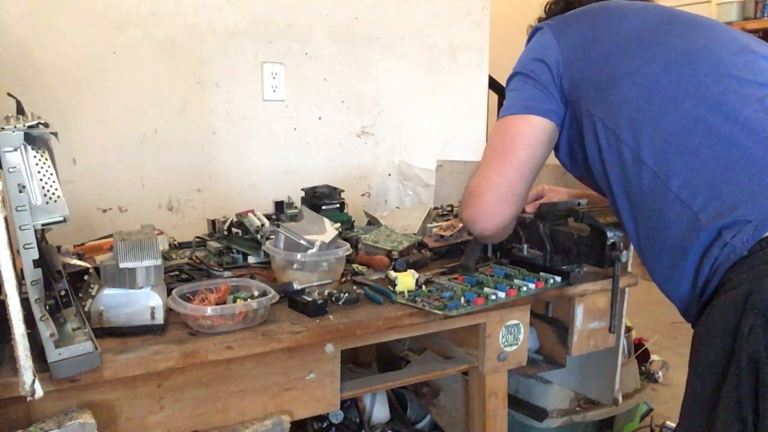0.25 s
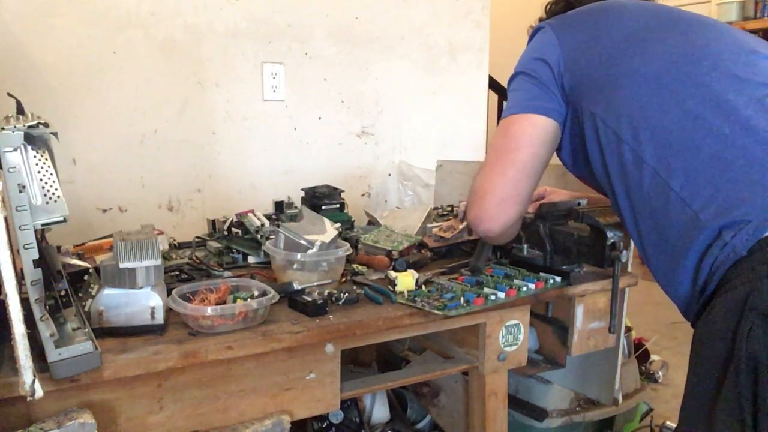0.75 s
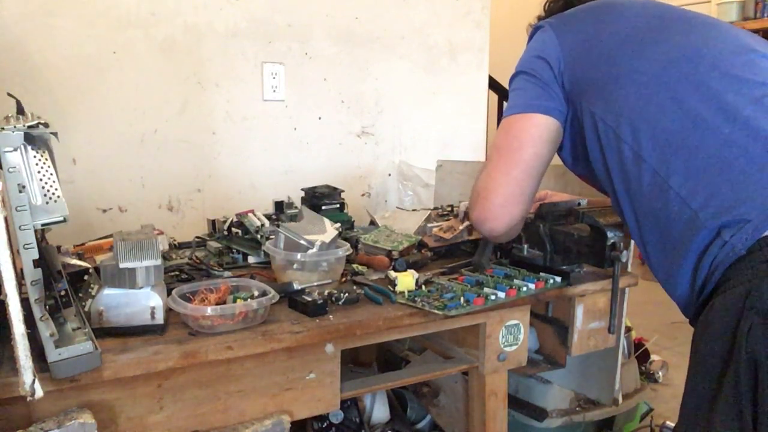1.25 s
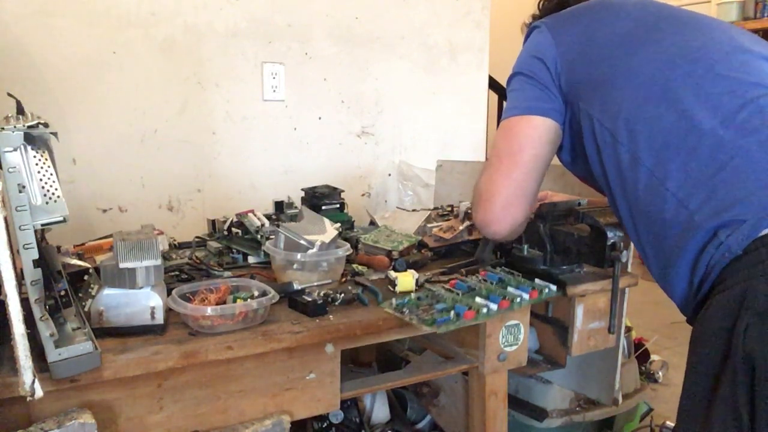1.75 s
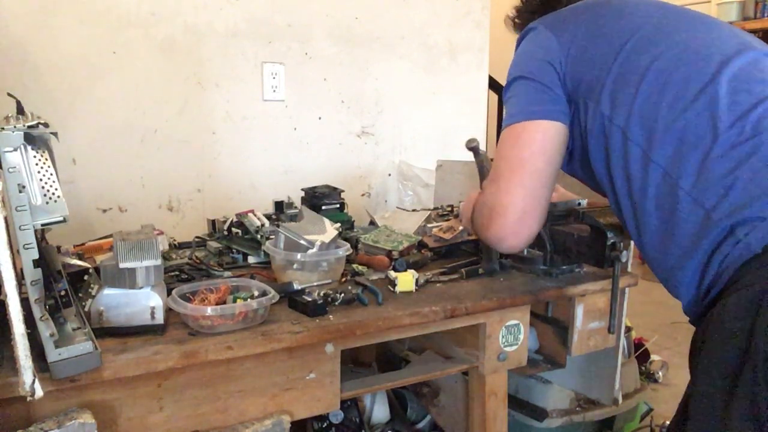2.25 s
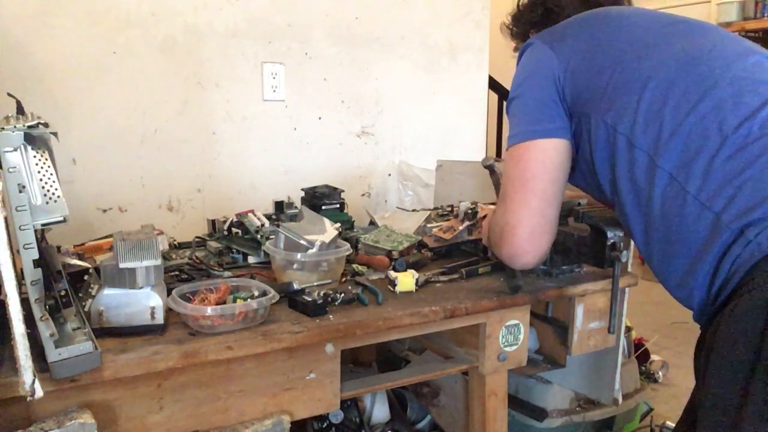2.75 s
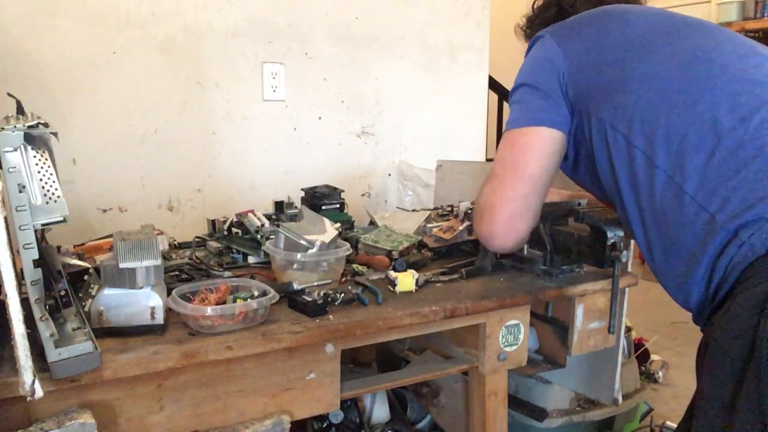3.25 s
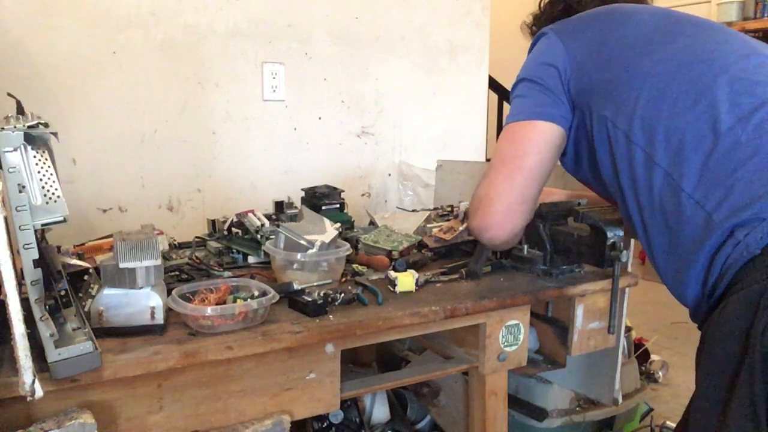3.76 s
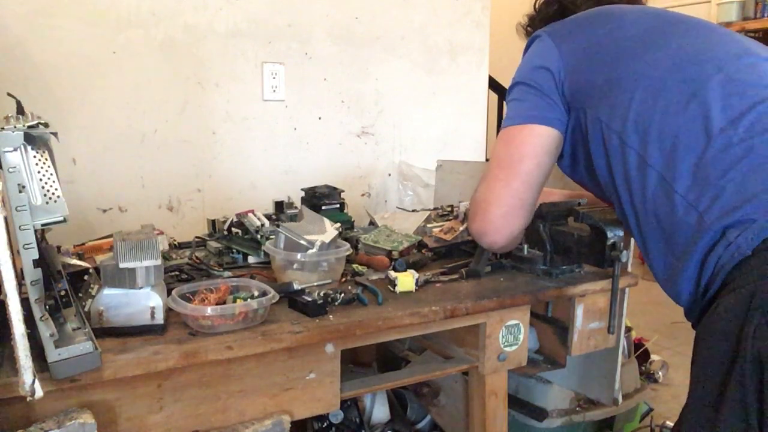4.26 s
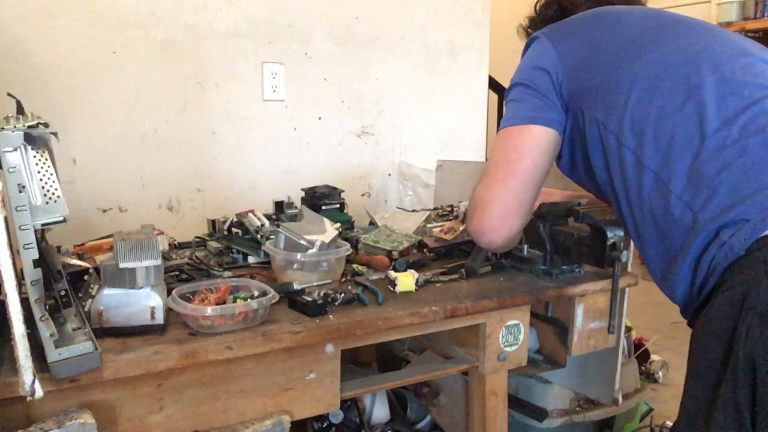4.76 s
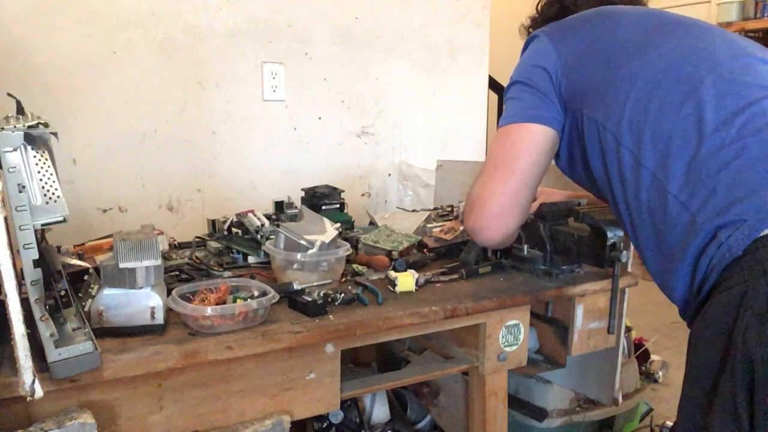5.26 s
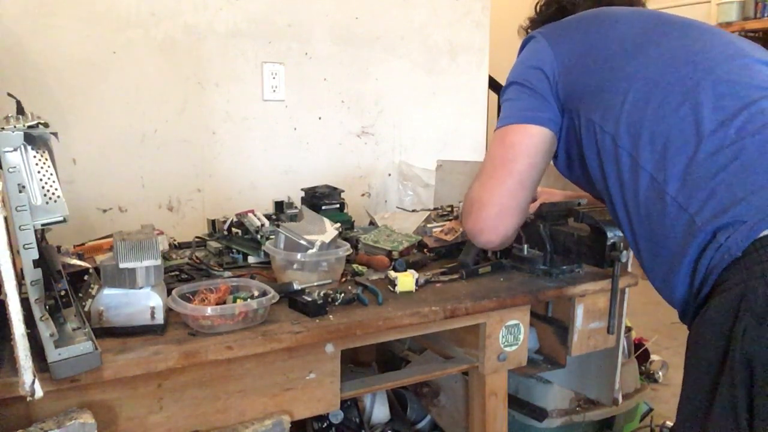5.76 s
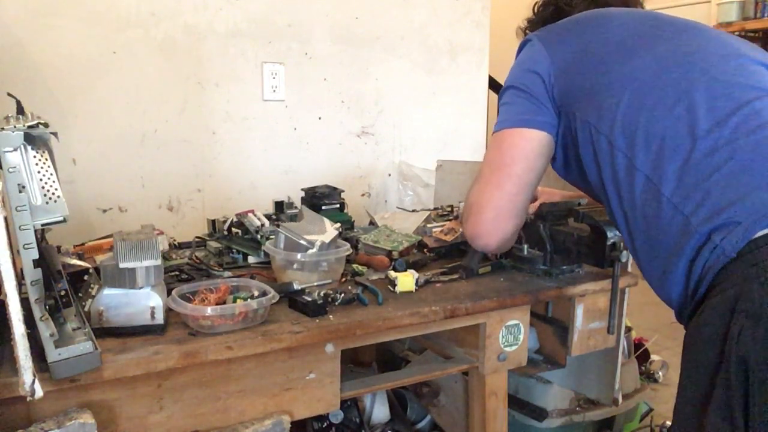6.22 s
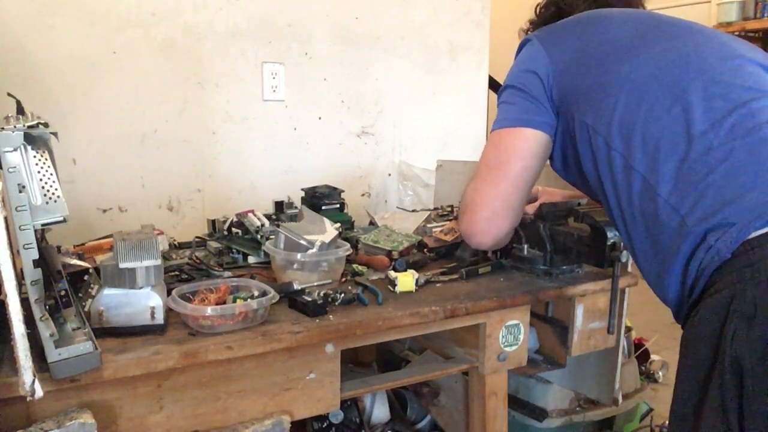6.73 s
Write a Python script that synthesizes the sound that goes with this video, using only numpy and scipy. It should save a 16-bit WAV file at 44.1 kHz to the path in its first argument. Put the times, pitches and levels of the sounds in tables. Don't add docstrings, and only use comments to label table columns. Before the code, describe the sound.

From 0 to 1.7 s a small steel hammer strikes a hollow plastic box over a vice, eight blows roughly 0.23 s apart. Each is a sharp tick and plastic crack with a boxy knock, short bench thud, slight metallic ring and chatter of loose parts. After a short gap, a circuit board slides off; from about 2.2 s it crashes into floor scrap, densest and loudest around 2.35-2.45 s, with scrapes, slaps and small metal pings, then bounces and settles by 3.05 s. At 3.1 s hammering resumes at a similar pace and continues to the end near 6.9 s, mostly firm, with weak taps near 5.7 and 6.0 s. Parts occasionally hop, notably at 3.56 s, and a thin high vice ring follows some blows. Hard-walled room, short bright reverberation, faint hush, small nearby microphone, little deep bass.

```python
import sys
import numpy as np
from scipy import signal
from scipy.fft import rfft, irfft
from scipy.io import wavfile
from scipy.ndimage import uniform_filter1d

SR = 44100
rng = np.random.default_rng(int(sys.argv[2]) if len(sys.argv) > 2 else 0)


def transcribe(u):
    v = np.clip(np.atleast_2d(u).T, -1, 1)
    q = np.round(v * 32767).astype(np.int16)
    wavfile.write(sys.argv[1], SR, q)


def gain_from_db(level_db):
    decades = np.asarray(level_db, float) / 20
    return 10 ** decades


N = 308233

# f/Hz, level/dB, t60/s
VICE_MODES = [(726, 0, .3), (1908, 0, .15), (4188, -6, .5)]


def colour(x, points):
    hz, db = np.transpose(points)
    f_hz = np.fft.rfftfreq(len(x), 1 / SR) + 1
    gain = gain_from_db(np.interp(np.log(f_hz), np.log(hz), db))
    return irfft(rfft(x) * gain, len(x))


def band(x, lo_hz, hi_hz):
    sos = signal.butter(2, [lo_hz, min(hi_hz, SR / 2.1)], "band", fs=SR, output="sos")
    return signal.sosfilt(sos, x)


def unit(x):
    return x / np.sqrt(uniform_filter1d(x ** 2, size=256).max())


def clock(size):
    return np.arange(size) / SR


def decay(t, t60_s):
    return np.exp(-np.log(1000) * t / t60_s)


def add(out, x, s):
    i = max(int(s * SR), 0)
    out[i:i + len(x)] += x[:N - i]


def ring(modes, scatter_db, loose, size=22050):
    hz, db, t60_s = np.array(modes, float).T[:, :, None]
    pitch, strength, phase = rng.standard_normal((3, len(modes), 1))
    t = clock(size)
    waves = np.sin(2 * np.pi * hz * (1 + loose * pitch) * t + phase) * decay(t, t60_s)
    return (gain_from_db(db + scatter_db * strength) * waves).sum(axis=0)


def struck(modes, rise_s, scatter_db=3.0, loose=0.0043):
    x = ring(modes, scatter_db, loose)
    return unit(x * (1 - np.exp(-(clock(len(x)) / rise_s) ** 2)))


def smear(spread_s, step_hz, size=22050):
    width = int(step_hz * size / SR)
    luck = np.repeat(rng.gamma(1.3, .77, size // 20), width)[:size // 2 + 1]
    lag_s = 0.000508 + spread_s * uniform_filter1d(luck, width)
    phase = 2 * np.pi * np.cumsum(lag_s) * SR / size
    x = irfft(np.exp(-1j * phase), size)
    x[size // 2:] = 0
    return x


def grains(size, per_s):
    chance, side = rng.random((2, size))
    strength = gain_from_db(3.5 * np.minimum(rng.exponential(size=size), 3.5))
    x = (chance < per_s / SR) * strength * np.sign(side - .5)
    return x / np.sqrt(np.mean(x ** 2))


def room_hush():
    # f/Hz, density/dB per Hz
    spectrum = [(30, -18), (100, -27), (200, 14), (500, -14), (1500, -20), (5000, -31), (10000, -20),
                (16000, -41)]
    x = colour(rng.standard_normal(N), spectrum)
    return gain_from_db(-66) * x / x.std()


def blows():
    # push into case and bench/dB, skid of face/dB, vice/dB
    first_bout = [
        (0.0014, -19.5, -10.5, -8.5, -21),
        (0.2323, -15, -6, 2, -21.5),
        (0.4808, -16.5, -20, -1.5, -28),
        (0.7715, -19.5, -3.5, -6.5, -17),
        (0.998, -19, -8, -19, -36),
        (1.216, -17, -5.5, -12, -22),
        (1.4407, -14.5, -2.5, -8, -22.5),
        (1.6745, -17.5, -9.5, -5.5, -19),
    ]
    second_bout = [(3.091, -20, -14.5, -6.5, -16.5), (3.3117, -19, -9.5, -3, -20),
                   (3.532, -17, -3.5, -15, -25), (3.7615, -23.5, -3.5, 7, -15.5),
                   (4.0404, -17.5, -13.5, -21, -38), (4.2746, -23.5, -5.5, -10, -36),
                   (4.5086, -17.5, -5.5, -15, -17), (4.7379, -15, -10, -13.5, -16.5),
                   (4.9625, -15.5, -9.5, -11.5, -22), (5.1942, -14, -9, -19, -21),
                   (5.4267, -13.5, -13.5, -18, -21.5), (5.675, -27.5, 0, 7, -21),
                   (5.9738, -30, -12.5, 0, -33), (6.2009, -17, -10.5, -17.5, -16.5),
                   (6.4208, -16.5, -9.5, -11, -19.5), (6.6365, -18, -4.5, -7.5, -12),
                   (6.855, -14, -12, -11, -16.5)]
    # box wall/dB, hammer head/dB, vice middle mode/dB
    seating = [
        (-2, -36, -38),
        (-4.5, -31, -43),
    ]
    usual_db = -17.5
    head_growth, vice_growth, wall_give = 1.64, 2.8, -0.11
    for bout, (wall_db, head_db, middle_db) in zip((first_bout, second_bout), seating):
        for s, force_db, push_db, skid_db, vice_db in bout:
            extra_db = force_db - usual_db
            box_db = wall_db + wall_give * extra_db
            thud_db = -7 + 0.33 * push_db
            steel_db = head_db + head_growth * extra_db
            vice_dbs = (force_db + vice_db, middle_db + vice_growth * extra_db, -49 + extra_db)
            parts_db = force_db - 20 + 0.69 * skid_db
            yield s, force_db, box_db, push_db, thud_db, skid_db, steel_db, vice_dbs, parts_db


def face_tick():
    # f/Hz, level/dB
    spectrum = [(7000, -2.5), (9000, 7), (10500, 1), (13500, 6.5), (16000, -12)]
    click = smear(0.001, 900) + gain_from_db(-2.5) * smear(.01, 110)
    return unit(band(colour(click, spectrum), 9600, 20000))


def box_top(crack):
    # f/Hz, level/dB, t60/s
    modes = [(2300, -1, .07), (2670, -1, .055), (2900, -1, .065), (3197, 0, .055), (3680, -8, .06),
             (3845, -9, .12), (3925, -7, .12), (4830, -7, .05)]
    return struck(modes, 0.0023) + gain_from_db(3) * unit(band(crack, 3170, 7090))


def box_wall(crack):
    # f/Hz, level/dB, t60/s
    modes = [(1030, -4, .035), (1200, -5, .035), (1385, -2, .06), (1490, -1, .035), (1565, 0, .045)]
    return struck(modes, 0.0016) + gain_from_db(1.5) * unit(band(crack, 698, 2040))


def box_case(crack):
    # f/Hz, level/dB, t60/s
    modes = [(335, -4, .05), (410, -2, .05), (490, -2, .045), (630, 0, .055), (850, -5, .04)]
    return struck(modes, 0.0029) + gain_from_db(1.5) * unit(band(crack, 270, 1080))


def bench_thud():
    # f/Hz, level/dB, t60/s
    modes = [(55, -15, .08), (104, -7, .12), (180, -5, .06), (219, 0, .08), (277, -3, .07)]
    return struck(modes, 0.0046)


def bottoming_knock():
    pulse = 1. * (clock(22050) == 0)
    knock = band(pulse, 380, 3200)
    return knock / knock.max()


def head_ring():
    # f/Hz, level/dB, t60/s
    modes = [(7765, -2, .08), (7820, 0, .12)]
    return struck(modes, .001, scatter_db=1, loose=.0005)


def parts_chatter():
    t = clock(22050)
    chatter = grains(len(t), 3500) * (t / .025) * np.exp(-t / 0.028)
    return unit(band(chatter, 630, 14600))


def hammer():
    # f/Hz, density/dB per Hz
    crack_spectrum = [(300, 27.5), (700, 7), (1000, -14), (1600, 3), (3000, -8), (5000, -19), (7000, -23),
                      (10000, -17), (16000, -20)]
    out = np.zeros(N)
    for s, force_db, box_db, case_db, thud_db, skid_db, steel_db, vice_dbs, parts_db in blows():
        crack = colour(smear(.007, 120), crack_spectrum)
        add(out, gain_from_db(force_db - 14.0) * (box_top(crack) + gain_from_db(skid_db + 4) * face_tick()), s)
        bending = gain_from_db(box_db) * box_wall(crack) + gain_from_db(case_db) * box_case(crack)
        add(out, gain_from_db(force_db - 7.0) * bending, s + 0.003355)
        add(out, gain_from_db(force_db - 1 + thud_db) * bench_thud(), s + 0.00489)
        add(out, gain_from_db(force_db + 0.5 - .15 * skid_db) * bottoming_knock(), s + .0052)
        add(out, gain_from_db(steel_db - 8) * head_ring(), s)
        for mode, db in zip(VICE_MODES, vice_dbs):
            add(out, gain_from_db(db + mode[1] - 3) * struck([mode], .003, scatter_db=0, loose=.0015), s + .002)
        add(out, gain_from_db(parts_db) * parts_chatter(), s)
    return out


def vice_singing():
    # t/s, level/dB
    sings = [
        (0.003, -41.5),
        (4.74, -40),
        (5.196, -41),
        (5.429, -42.5),
        (6.422, -43.5),
    ]
    out, t = np.zeros(N), clock(SR // 2)
    hz, _, t60_s = VICE_MODES[-1]
    tone = np.sin(2 * np.pi * hz * t) * decay(t, t60_s) * (1 - np.exp(-t / .003))
    for s, db in sings:
        add(out, gain_from_db(db) * tone, s)
    return out


def floor_contact(slap_db, low_db, thump_db, bright_db, scrape_ms):
    # f/Hz, level/dB, t60/s
    modes = [(209, -4, 0.067), (103, -11, 0.084), (273.3, -6, 0.088)]
    drag = smear(scrape_ms / 1000, 110)
    scrape = drag * (1 + 0.23 * np.abs(grains(len(drag), 900))) + gain_from_db(-6) * smear(0.000938, 491)
    slap = unit(band(scrape, 1110, 4570)) + gain_from_db(low_db) * unit(band(scrape, 328, 1850))
    bright = gain_from_db(bright_db) * unit(band(scrape, 2760, 13900))
    return gain_from_db(slap_db - 6.0) * (slap + bright + gain_from_db(thump_db) * struck(modes, 0.0043))


def part_hops():
    # low/dB, bright/dB
    hops = [
        (0.038, -26.5, -5, -19),
        (0.7988, -26.5, -12, -9),
        (1.6508, -33, 4, -22),
        (3.2076, -38, -9, -11),
        (3.5609, -22, -4, -6),
        (4.2993, -27, -3.5, -8),
        (4.5374, -26.5, -6, 0),
        (5.644, -56, -6, -20),
        (5.7022, -26.5, -3.5, -9),
        (6.004, -29.5, -2.5, -8),
    ]
    out = np.zeros(N)
    for s, slap_db, low_db, bright_db in hops:
        add(out, floor_contact(slap_db, low_db, -2.5, bright_db, scrape_ms=6.5), s)
    return out


def board_landings():
    # low/dB, thump/dB, bright/dB
    landings = [(2.1525, -121, -26, -13, -15), (2.212, -58, 0, -3, 2), (2.2497, -22.5, -2, -7, 9),
                (2.3401, -21.5, 3.5, -19, -1), (2.3523, -15, -31, -25, -2), (2.367, -26.5, 14, -22, 9.5),
                (2.397, -17, 4, -33, -31), (2.4101, -15.5, -2, -5.5, 4.5), (2.4297, -33, -1, 6, 5),
                (2.5509, -29.5, -8, -1, -6), (2.588, -24, -1, -7, -3), (2.6453, -23, -1.5, -9, -5),
                (2.6786, -26.5, 0, -4, -3), (2.6995, -17, -1.5, -9.5, 0), (2.7744, -30.5, 6, -2, -8),
                (2.7812, -23.5, -24, -14, -3), (2.896, -23, -10, -28, 3.5), (2.974, -30, -4, -10, -22),
                (3.0194, -35, -4, -35, -11)]
    slide_end_s, slide_ms, bounce_ms = 2.36, 11, 4.0
    out = np.zeros(N)
    for s, slap_db, low_db, thump_db, bright_db in landings:
        scrape_ms = slide_ms if s < slide_end_s else bounce_ms
        add(out, floor_contact(slap_db, low_db, thump_db, bright_db, scrape_ms), s)
    return out


def metal_pings():
    # t/s, f/Hz, level/dB, t60/s
    pings = [(2.216, 1390, -58, 0.033), (2.321, 7300, -39, .04), (2.356, 780, -22, 0.06),
             (2.366, 1030, -25.5, 0.032), (2.397, 1353, -21, 0.11), (2.425, 1390, -37, 0.082),
             (2.48, 1378, -44, 0.1), (2.698, 9020, -26, .02), (2.70, 878, -30, 0.06),
             (2.74, 890, -34.5, 0.084), (2.78, 2870, -41, 0.016), (2.898, 947, -38, 0.068),
             (2.945, 885, -40, 0.069), (2.965, 900, -38, 0.062), (2.985, 885, -35, 0.035),
             (3.011, 960, -54, 0.067), (3.04, 910, -66, 0.11)]
    out = np.zeros(N)
    for s, hz, db, t60_s in pings:
        pair = [(hz, 0, t60_s), (hz + 35, -4, t60_s)]
        add(out, gain_from_db(db) * struck(pair, .002, scatter_db=0, loose=0), s)
    return out


def scrap_shuffle():
    # t/s, level/dB
    track = [
        (2.26, -74),
        (2.304, -21),
        (2.398, -17.5),
        (2.426, -41),
        (2.588, -26),
        (2.818, -34),
        (3.01, -34.5),
        (3.07, -52),
    ]
    s, db = np.transpose(track)
    luck = np.repeat(rng.standard_normal(N // 400 + 1), 400)
    clusters = uniform_filter1d(luck, size=300)[:N]
    x = band(grains(N, 4000) * gain_from_db(8.4 * np.minimum(clusters, 1.1)), 310, 8500)
    return x * gain_from_db(np.interp(clock(N), s, db, left=-200, right=-200) - 13.0)


def echoes(x):
    # delay/s, level/dB
    paths = [
        (.0046, -6),
        (.0093, -14),
        (0.0149, -12),
    ]
    return x + sum(gain_from_db(db) * np.pad(x, (int(s * SR), 0))[:N] for s, db in paths)


def tail(x):
    # f/Hz, t60/s
    room_t60 = [(60, 0.68), (120, 0.57), (250, 0.32), (700, 0.49), (2000, 0.42), (5000, 0.48),
                (10000, 0.22), (16000, 0.25)]
    late_db, late_stretch = -14.5, 3.11
    t = clock(SR)
    hz, t60_s = np.transpose(room_t60)
    response = 0
    for f_hz in 32 * 2 ** np.arange(0, 9.1, .5):
        fall = decay(t, np.interp(np.log(f_hz), np.log(hz), t60_s))
        fall = fall + gain_from_db(late_db) * fall ** (1 / late_stretch)
        noise = band(rng.standard_normal(SR), f_hz / 2 ** .25, f_hz * 2 ** .25)
        response = response + noise * fall
    response *= 1 - np.exp(-(t / 0.012) ** 2)
    response = gain_from_db(-3.5) * response / np.sqrt(np.sum(response ** 2))
    return signal.fftconvolve(x, response)[:N]


def scene():
    bench = hammer() + vice_singing()
    floor = part_hops() + board_landings() + metal_pings() + scrap_shuffle()
    mix = echoes(bench) + tail(bench) + floor + tail(floor) + room_hush()
    return mix[None]


def roll_off(x):
    return signal.sosfilt(signal.butter(12, 17000, fs=SR, output="sos"), x)


def record(dry):
    x = signal.sosfilt(signal.butter(2, 90, "high", fs=SR, output="sos"), dry)
    x = signal.sosfilt(signal.ellip(8, .3, 45, 15700, fs=SR, output="sos"), x)
    return roll_off(x)


dry = scene()
out = record(dry)
transcribe(out)
```